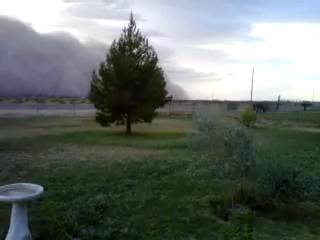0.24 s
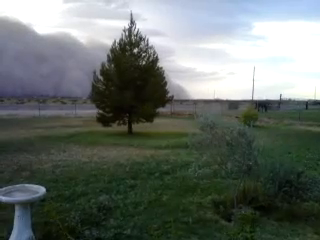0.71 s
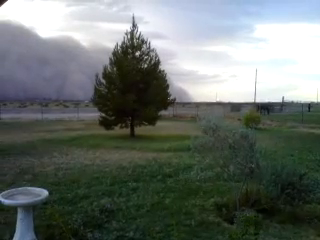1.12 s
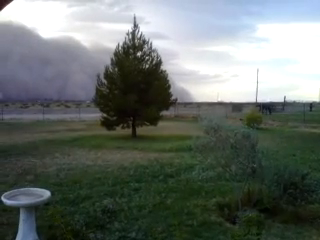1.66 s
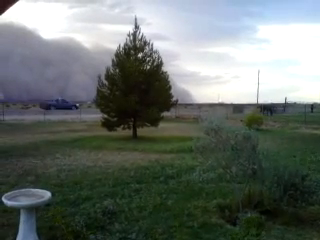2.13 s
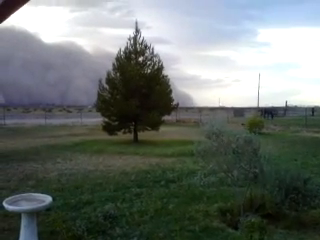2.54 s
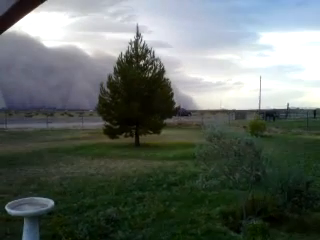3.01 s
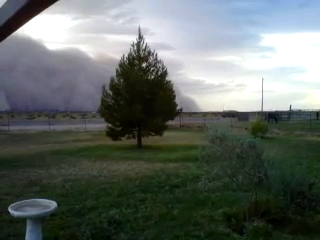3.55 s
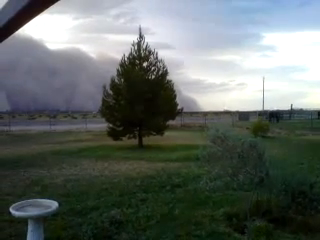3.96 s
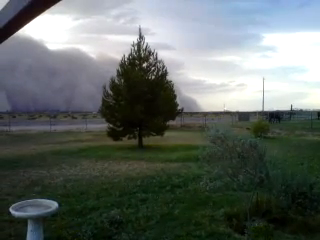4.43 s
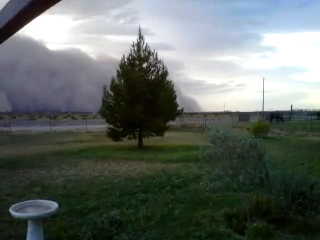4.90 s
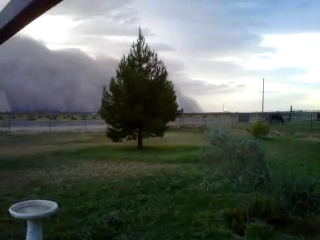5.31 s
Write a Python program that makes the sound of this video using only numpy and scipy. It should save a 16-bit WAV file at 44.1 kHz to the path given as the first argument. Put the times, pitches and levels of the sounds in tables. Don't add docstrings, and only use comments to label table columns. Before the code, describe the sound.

Outdoors in a grassy yard, a steady low V-engine drone goes by at middle distance, dropping in pitch as it leaves. Tyre rush outlasts the engine, surging near three seconds, then thinning to quiet air and a faint far motor. Leafy rustle stops short midway; small nearby knocks and one tiny chirp follow. Cheap mono camera sound, narrow and slightly garbled.

```python
import sys
import numpy as np
from scipy import signal
from scipy.io import wavfile
from scipy.ndimage import uniform_filter1d, map_coordinates

SR = 44100
rng = np.random.default_rng(int(sys.argv[2]) if len(sys.argv) > 2 else 0)


def to_linear_factor(level_db):
    exponent = np.asarray(level_db, float) / 20
    return 10 ** exponent


def digitize_waveform(pressure):
    field = np.atleast_2d(pressure).T
    bounded = np.clip(field, -1, 1)
    quanta = np.round(bounded * 32767).astype(np.int16)
    wavfile.write(sys.argv[1], SR, quanta)


N = 245337

# (time [s], frequency [Hz])
FIRING = [(0, 149), (.3, 148.6), (.45, 148), (.6, 145.8), (.9, 144.2), (1.2, 142.5), (1.6, 141.9),
          (1.8, 139.9), (2.1, 136.1), (2.4, 131), (2.55, 128.6), (2.85, 127.2), (3, 124.3), (3.3, 121.2),
          (3.6, 120), (4.2, 118), (4.8, 117.3), (5.56, 115.7)]
# (time [s], level [dB])
EXHAUST = [(0.0, -25.5), (0.148, -23.5), (0.301, -25), (0.612, -22), (0.72, -26.5), (0.829, -23),
           (0.92, -25.5), (1.049, -24.5), (1.501, -26.5), (1.952, -26), (2.249, -32), (2.55, -36.5),
           (2.7, -41), (2.869, -41.5), (3.15, -48.5), (3.281, -47), (3.4, -60.5), (5.56, -60.5)]
# (order [-], level re leading level [dB])
ORDER_GROUPS = [
    [(5, 0), (6, -6)],
    [(7, -16), (8, 0), (9, -20.5)],
    [(10, -12.5), (11, 1.5), (12, -25)],
    [(13, -2), (14, 1), (15, -11.5)],
    [(15, -7), (16, 0)],
]
BLOOMING_ORDERS = (5, 11, 14, 16)
# (order [-], peak [s], rise [s], fall [s], level [dB])
BLOOMS = [(5, .15, 0.25, 0.42, -45.5), (5, 1.55, 0.36, 0.22, -44), (5, 2, .15, 0.3, -43),
          (11, 0.17, 0.29, 0.29, -34.5), (11, .7, .08, 0.044, -44.5), (14, 0.046, 0.12, 0.088, -41),
          (11, 1.65, 0.39, 0.6, -38.5), (11, 2.2, 0.24, 0.13, -40), (11, 2.95, 0.22, 0.13, -44),
          (11, 5.4, 0.58, .3, -58), (14, .6, 0.36, 0.17, -39), (14, .95, 0.17, 0.31, -36.5),
          (14, 1.3, 0.43, 0.75, -36), (14, 2.15, 0.23, .45, -40.5), (14, 3.45, 0.17, 0.091, -55),
          (14, 3.95, 0.43, 0.21, -51), (16, .45, 0.094, 0.13, -39.5), (16, 0.89, 0.28, 0.36, -46.5),
          (16, 2.4, 0.18, 0.41, -45), (16, 3.9, .4, .9, -49), (16, 4.9, .7, .5, -51)]
BLOOM_FLOOR_DB = -62.5
# (peak [s], rise [s], fall [s], level [dB])
PUFFS = [
    (.2, 0.41, 0.16, -47),
    (.5, .15, .1, -46.5),
    (.612, .02, 0.01, -41),
    (1.6, .3, .25, -44),
    (2.45, .2, .3, -44),
    (2.9, 0.33, 0.15, -46),
]
RUSH_DB, CLOSEST_S, LEAVING_S = -51, 2.2, 0.89
# (frequency [Hz], density [dB per Hz])
RUSH = [(60, -31), (110, -6), (200, -4), (330, -4.5), (480, -9), (650, -25), (900, -34)]
# (time [s], exhaust band [Hz], tyre band [Hz])
ECHO = [(0, 326.5, 990), (.5, 331.5, 1066), (1.1, 299, 1122), (1.35, 432, 911), (1.7, 427.3, 944),
        (2.2, 407, 873), (2.5, 476, 1035), (2.8, 548, 1112), (3.1, 381, 1002), (3.6, 333, 1080),
        (4.3, 300.6, 1057), (5.56, 316.5, 997)]
# (time [s], roar [dB], tread re roar [dB], cavity share [0-1])
ROAD = [(0.0, -41, -27.5, 0.7), (.1, -43.5, -24.5, .5), (.32, -47, -22, 0.5), (.45, -38.5, -17.5, .3),
        (.617, -37.5, -14, 0.2), (.66, -41, -15, .3), (.9, -47.5, -14, 0.2), (1.12, -43, -17, .3),
        (1.3, -47.5, -6, 0.3), (1.55, -44.5, -9, 0.5), (2.1, -50, -11.5, 0.2), (2.42, -45.5, -8, 0.1),
        (2.8, -33.5, -13, .7), (3.2, -43, -12, 0.9), (3.44, -38.5, -17, 0.9), (4.06, -43.5, -9.5, .7),
        (4.16, -48.5, -9, 0.7), (5.56, -50, -12, .3)]
# (frequency [Hz], density [dB per Hz])
ROAR = [(450, -37.5), (650, -8), (850, -3.5), (1200, 0), (1450, -3), (1700, -5.5), (2000, -34), (2500, -37)]
# (frequency [Hz], width [Hz])
CAVITY = (1360, 210)
# (frequency [Hz], density [dB per Hz])
TREAD = [(1400, -30), (1800, 6), (2000, -3.5), (2150, 3.5), (2400, -8.5), (2800, -16), (3400, -36),
         (4000, -36.5)]
# (peak [s], rise [s], fall [s], level [dB])
SINGS = [
    (1.4, 0.17, 0.24, -65),
    (3.1, 0.13, 0.15, -65),
    (3.95, .2, .15, -58),
]
# (frequency [Hz], width [Hz])
SING = (2140, 140)
# (time [s], frequency [Hz], t60 [s], level [dB])
KNOCKS = [
    (1.567, 927, 0.036, -25),
    (3.533, 2620, 0.0053, -41.5),
    (3.531, 3290, 0.004, -45),
    (5.005, 500, 0.057, -36),
    (5.157, 556, 0.019, -33),
    (5.156, 734, 0.051, -51),
]
# (time [s], length [s], start [Hz], end [Hz], level [dB])
CHIRPS = [
    (3.822, .014, 4900, 4600, -60),
    (3.84, .012, 4400, 4600, -66),
    (3.856, .012, 4500, 4800, -67),
    (3.908, .028, 3700, 4450, -58),
]
# (peak [s], rise [s], fall [s], level [dB])
GUSTS = [(0., .01, 0.009, -53), (0.471, 0.14, .08, -58.5), (.6, .1, 0.11, -58.5), (.78, 0.066, .08, -59),
         (1.05, 0.28, 0.17, -62), (1.38, 0.23, .2, -60.5), (1.7, 0.24, 0.31, -64), (2.719, .2, 0.28, -68.5),
         (3.6, 0.0091, 0.026, -70), (3.92, 0.11, 0.025, -67), (4.93, .03, 0.045, -72),
         (5.33, 0.12, 0.076, -77.5)]
EARLY_FLOOR_DB, LATE_FLOOR_DB, DROP_S = -67.5, -83.5, 2.36
# (frequency [Hz], density [dB per Hz])
RUSTLE = [(1940, -48.5), (3300, -18), (3890, -9), (4240, -0.5), (4430, 0), (4890, -2.5), (5740, -9.5),
          (6490, -9.5), (6860, -15.5), (7260, -35.5), (9440, -51.5), (16000, -120)]
# (time [s], level [dB])
WIND = [(0.0, -55), (0.62, -43.5), (0.74, -58.5), (0.88, -66.5), (1.04, -55), (1.67, -50), (2.82, -69),
        (2.93, -52), (3.17, -64), (4.65, -58.5), (5.13, -68), (5.56, -61)]
# (frequency [Hz], density [dB per Hz])
BUFFET = [(10, -6), (25, 4), (60, 0), (85, -7), (130, -24.5)]
# (frequency [Hz], width [Hz], level [dB])
HUM = [(83.9, 5, -60), (159.3, 6.8, -62)]
# (frequency [Hz], density [dB per Hz])
AIR = [(15, -20), (30, -5), (180, -4.5), (260, -8.5), (370, -15.5), (580, -14.5), (750, -6), (1050, -2),
       (1400, -4.5), (1650, -12.5), (2200, -19), (2700, -32.5), (4700, -36), (7600, -40)]
AIR_DB = -47.5
# (time [s], depth [dB], recovery [s])
DIP = (.617, -6, 0.09)
# (frequency [Hz], step re band level [dB])
STEP = [(1, -8), (300, -4), (600, 3), (1500, 5), (2500, 9), (4000, 13.5), (8000, 14)]
BAND_EDGES = np.unique(np.round(np.cumsum(np.maximum(8, 4.4 * 1.068 ** np.arange(44))))).astype(int)
SHORT_BLOCKS = [0, 6, 9, 10, 11, 12, 13, 24, 27, 30, 36, 43, 55, 60, 61, 77]
BLOCK_OFFSET = 804


def evened(x):
    return x / np.sqrt(np.mean(x ** 2) + 1e-20)


def read(points, hz):
    f, value = np.transpose(points)
    return np.interp(np.log(hz + 1), np.log(f + 1), value, left=-99, right=-99)


def follow(rows):
    s, *columns = np.transpose(rows)
    return [np.interp(np.arange(N) / SR, s, c) for c in columns]


def add(mix, s, sound):
    part = mix[round(s * SR):][:len(sound)]
    part += sound[:len(part)]


def drift(per_s):
    steps = rng.standard_normal(4000)
    at = np.arange(0, N + 64, 64)
    curve = map_coordinates(steps, [at / SR * per_s], order=3)
    return evened(np.interp(np.arange(N), at, curve))


def swells(rows, floor_db):
    t, power = np.arange(N) / SR, to_linear_factor(2 * floor_db)
    for s, rise_s, fall_s, db in rows:
        width_s = np.where(t < s, rise_s, fall_s)
        power = power + to_linear_factor(2 * db) * np.exp(-2 * ((t - s) / width_s) ** 2)
    return 10 * np.log10(power)


def resonate(x, hz, width_hz):
    turn = np.exp(2j * np.pi * np.cumsum(hz * np.ones(len(x))) / SR)
    r = np.exp(-np.pi * width_hz / SR)
    return 2 * (turn * signal.lfilter([1 - r], [1, -r], x / turn)).real


def noise(spectrum, patchy_db, flicker_db):
    frames, hz = N // 256 + 5, np.fft.rfftfreq(1024, 1 / SR)
    a, b, patches = rng.standard_normal((frames, 513, 3)).T
    patches = uniform_filter1d(patches, size=7, axis=0)
    patches = evened(uniform_filter1d(patches, size=12, axis=1))
    flicker = evened(uniform_filter1d(rng.standard_normal(frames), size=5))
    level_db = read(spectrum, hz)[:, None] + patchy_db * patches + flicker_db * flicker
    z = (a + 1j * b) * to_linear_factor(level_db)
    return evened(signal.istft(z, nperseg=1024, noverlap=768)[1][:N])


def rush_level():
    away = np.maximum(np.arange(N) / SR - CLOSEST_S, 0) / LEAVING_S
    return swells(PUFFS, RUSH_DB - 10 * np.log10(1 + away ** 2))


def engine(rush_db):
    cycle_hz = follow(FIRING)[0] / 8
    turns = np.cumsum(cycle_hz * (1 + .001 * drift(per_s=20))) / SR
    echo_hz = follow(ECHO)[0]
    blooms = []
    for strong in BLOOMING_ORDERS:
        blooms.append(swells([b[1:] for b in BLOOMS if round(b[0]) == strong], BLOOM_FLOOR_DB))
    lope_db, *overtones_db = blooms
    high = [(order, -12 - 2.1 * np.sqrt(order - 17)) for order in range(17, 50)]
    levels = [lope_db, follow(EXHAUST)[0], *overtones_db, rush_db]
    out = np.zeros(N)
    for level_db, orders in zip(levels, ORDER_GROUPS + [high]):
        for order, db in orders:
            waver_db = (.3 - .15 * db) * drift(per_s=2.5)
            echo_db = 2.2 * (order > 16) * np.exp(-((order * cycle_hz - echo_hz) / 55) ** 2)
            tone = np.cos(2 * np.pi * (round(order) * turns + rng.random()))
            out += to_linear_factor(level_db + db + waver_db + echo_db) * tone
    return np.sqrt(2) * out


def exhaust_rush(rush_db):
    rush = noise(RUSH, patchy_db=2, flicker_db=3)
    rush = evened(rush + 1.3 * resonate(rush, follow(ECHO)[0], width_hz=70))
    return to_linear_factor(rush_db + .7 * drift(per_s=30)) * rush


def tyres():
    roar_db, bright_db, share = follow(ROAD)
    roar_db = roar_db + .7 * drift(per_s=40)
    roar = noise(ROAR, patchy_db=2.2, flicker_db=.05)
    echo = resonate(roar, follow(ECHO)[1], width_hz=80)
    cavity = resonate(roar, *CAVITY)
    roar = evened(roar + 4 * ((1 - share) * echo + share * cavity))
    tread = noise(TREAD, patchy_db=1.5, flicker_db=1.55)
    song = evened(resonate(resonate(tread, *SING), *SING))
    out = to_linear_factor(roar_db) * roar + to_linear_factor(roar_db + bright_db) * tread
    return out + to_linear_factor(swells(SINGS, floor_db=-76.5)) * song


def knocks():
    out, t = np.zeros(N), np.arange(4000) / SR
    for s, hz, t60_s, db in KNOCKS:
        envelope = to_linear_factor(db - 60 * t / t60_s) * (1 - np.exp(-15 * t / t60_s))
        add(out, s, envelope * np.sin(2 * np.pi * hz * t))
    return out


def bird():
    out = np.zeros(N)
    for s, length_s, start_hz, end_hz, db in CHIRPS:
        u = np.linspace(0, 1, round(length_s * SR))
        hz = start_hz + (end_hz - start_hz) * np.sin(np.pi / 2 * u)
        add(out, s, to_linear_factor(db) * np.sin(np.pi * u) * np.sin(2 * np.pi * np.cumsum(hz) / SR))
    return out


def leaves():
    early_db = swells([g for g in GUSTS if g[0] < DROP_S], EARLY_FLOOR_DB)
    late_db = swells([g for g in GUSTS if g[0] >= DROP_S], LATE_FLOOR_DB)
    level_db = np.where(np.arange(N) / SR < DROP_S, early_db, late_db)
    return to_linear_factor(level_db + 1.1 * drift(per_s=30)) * noise(RUSTLE, patchy_db=.7, flicker_db=1.43)


def wind():
    level_db = follow(WIND)[0] + .77 * drift(per_s=16)
    return to_linear_factor(level_db) * noise(BUFFET, patchy_db=3, flicker_db=.7)


def far_motor():
    rumble, out = rng.standard_normal(N), np.zeros(N)
    for hz, width_hz, db in HUM:
        out += to_linear_factor(db) * evened(resonate(resonate(rumble, hz, width_hz), hz, width_hz))
    return out


def still_air():
    return to_linear_factor(AIR_DB) * noise(AIR, patchy_db=.84, flicker_db=.45)


def scene():
    rush_db = rush_level()
    pickup = engine(rush_db) + exhaust_rush(rush_db) + tyres()
    nearby = knocks() + bird() + leaves() + wind()
    return (pickup + nearby + far_motor() + still_air())[None]


def gain_control(x):
    s, depth_db, recovery_s = DIP
    after_s = np.arange(N) / SR - s
    fall = np.clip(after_s / .0083, 0, 1)
    return x * to_linear_factor(depth_db * fall * np.exp(-np.maximum(after_s, 0) / recovery_s))


def rounded(x, size, top_hz, coarse_db):
    n, k, group = np.arange(2 * size)[:, None], np.arange(size), 1024 // size
    hz = k * 8000 / size
    window = signal.windows.kaiser_bessel_derived(2 * size, 4 * np.pi)[:, None]
    basis = np.sqrt(2 / size) * window * np.cos(np.pi / size * (n + .5 + size / 2) * (k + .5))
    halves = x.reshape(-1, size)
    c = np.hstack([np.roll(halves, 1, axis=0), halves]) @ basis

    band = np.searchsorted(BAND_EDGES, k * group, "right")
    member = band[:, None] == np.unique(band)
    level_db = 20 * np.log10(abs(c) + 1e-9) @ (member / member.sum(0))
    level_db = level_db.reshape(-1, group, member.shape[1]).mean(1)
    wander = evened(uniform_filter1d(rng.standard_normal(level_db.shape), size=3, axis=0))
    level_db = uniform_filter1d(level_db, size=3, axis=1) + 1.1 * wander
    busy_db = level_db.mean(1, keepdims=True)
    level_db = level_db + .25 * (busy_db - busy_db.mean())

    step_db = np.repeat(level_db, group, axis=0) @ member.T + read(STEP, hz + 1) + coarse_db
    step = to_linear_factor(step_db)
    count = np.floor((abs(c) / step) ** .75 + .4054)
    c = np.sign(c) * step * count ** (4 / 3) * (hz < top_hz)
    c = c * np.where(abs(hz - 3995) < 22, .15, 1)
    back = c @ basis.T
    return (np.roll(back[:, :size], -1, axis=0) + back[:, size:]).ravel()


def camera_storage(x):
    blocks, shift = 90, 512
    lead = 2 * 1024 - BLOCK_OFFSET - shift
    low = np.pad(signal.resample_poly(x, 160, 441), (lead, 4096))[:blocks * 1024]
    long = np.roll(rounded(np.roll(low, shift), size=1024, top_hz=7260, coarse_db=-.17), -shift)
    short = rounded(low, size=128, top_hz=7400, coarse_db=-1.82)
    is_short = np.isin(np.arange(blocks) - 1, SHORT_BLOCKS)
    switch = uniform_filter1d(np.repeat(is_short, 1024) * 1., size=128)
    mixed = (long + switch * (short - long))[lead:]
    return signal.resample_poly(mixed, 441, 160)[:N]


def band_limit(x):
    return signal.sosfilt(signal.butter(12, 7410, fs=SR, output="sos"), x)


def record(dry):
    mix = camera_storage(gain_control(dry[0]))[None]
    return band_limit(mix)


dry = scene()
out = record(dry)
digitize_waveform(out)
```